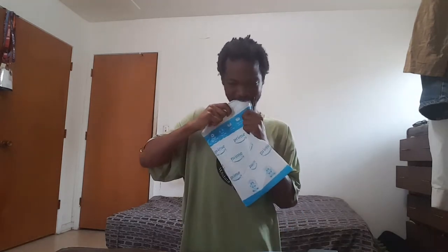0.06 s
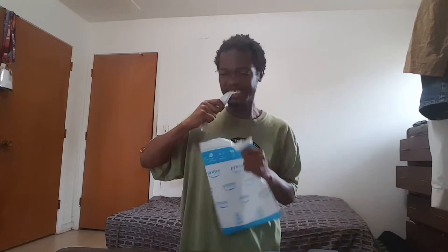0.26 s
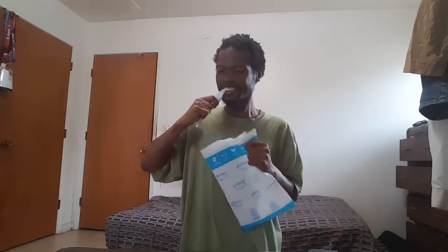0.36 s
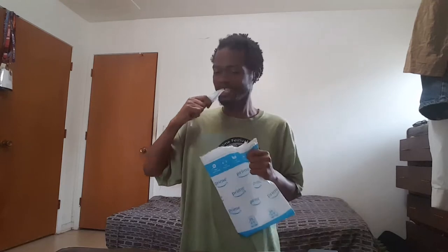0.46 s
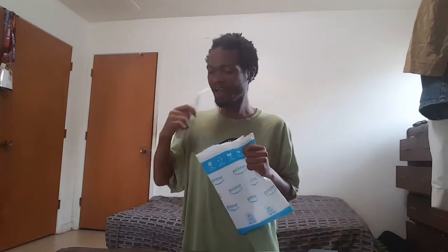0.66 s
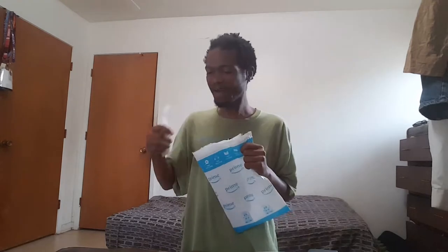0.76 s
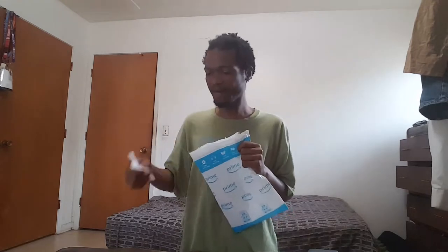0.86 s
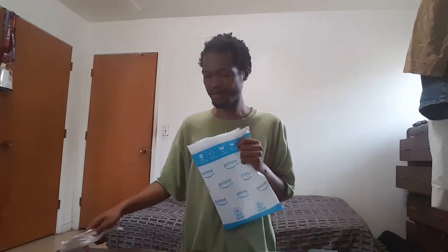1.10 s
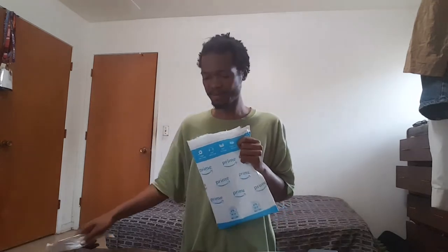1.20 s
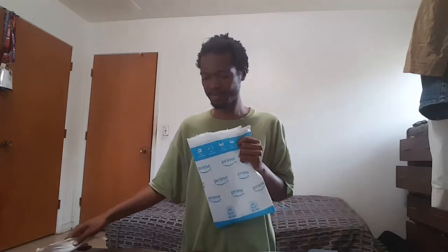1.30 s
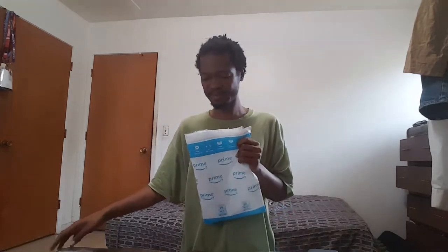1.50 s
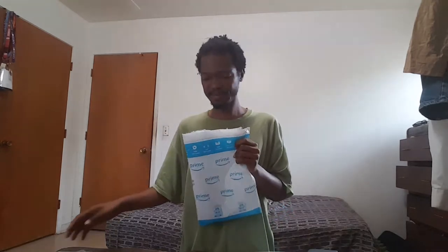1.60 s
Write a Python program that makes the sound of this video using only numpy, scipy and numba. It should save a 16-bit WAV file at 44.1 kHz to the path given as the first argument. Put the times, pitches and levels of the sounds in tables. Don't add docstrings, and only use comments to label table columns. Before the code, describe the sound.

Stiff plastic envelope torn open in one short loud rip, followed by fading film crinkles indoors.

```python
import sys
import numpy as np
from scipy import signal
from scipy.fft import rfft, irfft
from scipy.io import wavfile
from scipy.ndimage import uniform_filter1d
from numba import njit

SR = 44100
rng = np.random.default_rng(int(sys.argv[2]) if len(sys.argv) > 2 else 0)


def rack_gain(trim_db):
    fader = np.asarray(trim_db, float)
    return 10 ** (fader / 20)


def master_out(mix):
    frames = np.transpose(np.atleast_2d(mix))
    ceiling = np.clip(frames, -1, 1)
    pcm = np.round(ceiling * 32767).astype(np.int16)
    wavfile.write(sys.argv[1], SR, pcm)


N = 72765

# f/Hz, level/dB per Hz
HOUSE_SPECTRUM = [(25, -6), (50, -2.5), (200, 0.5), (500, -9.5), (1000, -16), (2000, -10.5), (4500, -16.5),
                  (8000, -24), (15500, -45)]
# f/Hz, t60/s
ROOM_DECAY = [(150, 0.4), (500, 0.54), (1500, 0.12), (4000, 0.64), (9000, 0.44)]
# t/s, level/dB
ECHOES = [
    (.008, -29),
    (0.0148, -17),
]
# f/Hz, level/dB, t60/s
STRIP_RINGS = [(560, -1.5, 0.0093), (880, 1.5, 0.01), (1617, 1.5, 0.025), (2644, 0.5, 0.026),
               (3730, -4, 0.0057), (5250, -2.5, 0.0066)]
# t/s, length/s, f/Hz, end pitch re start/ratio
SCRAPES = [(.315, .012, 830, 1), (.425, .025, 330, .9), (.47, .03, 700, 1), (.571, .016, 3150, .97),
           (.596, .015, 1400, 1), (.6, .045, 4500, .95), (.62, .045, 1520, 1.05), (.7, .04, 4200, 1.05),
           (.712, .028, 750, .95), (1.03, .03, 320, 1), (1.1, .04, 2600, 1), (1.19, .05, 790, 1),
           (1.384, .032, 4300, 1.02), (1.495, .055, 2680, .96), (1.495, .04, 1680, .97),
           (1.497, .04, 900, .9), (1.5, .045, 3800, 1), (1.555, .035, 1700, 1.25), (1.637, .012, 2600, 1.3)]
SCRAPE_LEVELS = [-24, -39.5, -41.5, -28, -42, -46, -43, -50, -40, -56, -57, -51, -51, -52, -56, -57, -62,
                 -58, -52]
# t/s, level/dB, brightness/dB per octave
HANDLING = [(0, -36.5, -0.5), (.03, -37.5, 3), (.14, -40.5, 1), (.2, -36.5, 1.5), (.33, -32, 2),
            (.44, -36, 0), (.54, -45, 0), (.6, -41.5, 3.5), (.68, -47.5, -1), (.72, -43.5, 0),
            (.77, -54, -0.5), (.95, -62.5, -0.5), (1.1, -49.5, 0), (1.22, -54, -0.5), (1.3, -67.5, -3),
            (1.47, -65, -4.5), (1.57, -56, 2), (1.65, -81, -2)]
# f/Hz, level/dB per Hz
FILM_COLOUR = [(88, -46), (150, -42), (722, -4.5), (1450, -7), (1660, -5), (2450, -5.5), (3690, -14.5),
               (9540, -22), (15500, -60)]
# t/s, peak/dB, f/Hz, crack re peak/dB, thump re peak/dB
PULL_SNAPS = [(0.009, -29, 1790, -7, -34), (0.018, -40, 2190, -19, -19), (0.027, -44, 2450, -13, -32),
              (0.045, -48, 2510, -23, -29), (0.053, -19, 1940, -25, -25), (0.059, -19.5, 2600, -16, -19),
              (0.068, -23, 2570, -17, -21), (0.089, -14.5, 2370, -14, -24), (0.162, -24.5, 980, -15, -23),
              (0.167, -15, 1270, -16, -16), (0.2113, -17, 2420, -4.5, 1.5),
              (0.2172, -1.5, 1000, -20, -14.5), (0.2197, -4.5, 1940, -21, -15.5),
              (0.228, -29, 1440, -19, -26), (0.2355, -5, 1520, -14, 3), (0.2412, -15.5, 1270, -39, -5),
              (0.2457, -5.5, 960, -16, -7), (0.2512, -6.5, 1030, -21, -7), (0.2545, -14, 750, -12, 4),
              (0.263, -8, 885, -9, -6), (0.2658, -9, 1920, -20, -13), (0.2675, -3.5, 2820, -24, -17),
              (0.2725, -4, 1100, -23, -16), (0.2762, -15, 1320, -11, -21), (0.2785, -9.5, 1130, -21, -12),
              (0.2835, -11, 900, -3, -5.5), (0.2927, -2, 1240, -15.5, -26), (0.306, -3, 1050, -12, -26),
              (0.3085, -12.5, 1420, -12, -5), (0.319, -14, 840, -25, 1), (0.43, -30, 1450, -1.5, -36),
              (0.445, -31.5, 1385, -19, 10.5)]
# t/s, peak/dB, f/Hz, crack re peak/dB, thump re peak/dB
STRIP_SNAPS = [(.5575, -36, 4940, -12, -20), (.562, -24, 1750, -20, -20), (.5692, -13, 3070, -13, -8),
               (.5755, -48, 2980, -18, -24), (.5815, -24, 1430, -17, -7), (.588, -20, 1470, -12, -38),
               (.5908, -26, 1590, 4.5, -28), (.5955, -23, 1390, -20, -25), (.618, -17.5, 1540, -6.5, -12),
               (.6395, -24, 1800, -15, -1.5), (.641, -24, 1710, -7, -1), (.6725, -28.5, 1770, -12, -6),
               (.6822, -30, 4230, -2, -30), (.7072, -25.5, 1860, -7, -16), (.713, -23, 2180, -16, -3),
               (.7235, -31, 1030, -1.5, -10), (.755, -52, 1560, -9, -17)]
# t/s, peak/dB, f/Hz, crack re peak/dB, thump re peak/dB
LATE_SNAPS = [(0.802, -44.5, 4250, 2.5, -11), (0.834, -48, 2000, -2, -17), (0.844, -41, 5500, -3.5, -18),
              (0.861, -45, 3030, -3.5, -20), (0.898, -44, 2860, -4.5, -19), (0.9265, -44, 1620, -15, -10),
              (0.9464, -41, 2450, -15, -16), (1.0357, -39.5, 2700, -24, -1), (1.33, -47, 2400, -26, -14),
              (1.421, -43, 2300, -18, -14), (1.504, -36, 2580, -13, -17), (1.5615, -38.5, 2300, -10, -7),
              (1.612, -44, 4900, -15, -20), (0.978, -32, 1860, -11, -14), (0.986, -39.5, 2310, -20, 2),
              (1.084, -29.5, 1320, -24, 5), (1.161, -34.5, 1790, -1, -3), (1.183, -36.5, 2930, -8, 0),
              (1.203, -36, 1500, -19, -4), (1.212, -41, 2860, -2, 4), (1.252, -34, 2000, -12, -15),
              (1.273, -34.5, 1580, -16, -2.5), (1.36, -35.5, 1810, -33, -11), (1.375, -37, 2190, -5.5, -12),
              (1.41, -37.5, 1680, -16, -18), (1.446, -39, 1530, -15, -8), (1.55, -36, 1740, -9, -18),
              (1.631, -35, 1830, -21, -10)]
CRACK_BANDS = 3800, 6800, 7600, 13500
# t/s, level/dB, flap of the bag/dB
RIP_PULL = [
    (.195, -44, -63),
    (.212, -30.5, -34),
    (.222, -20, -25),
    (.238, -19.5, -19),
    (.274, -16.5, -30),
    (.295, -24, -37),
    (.315, -26.5, -39),
    (.34, -38, -47),
    (.37, -83, -67),
]
# f/Hz, level/dB per Hz
SEAM_COLOUR = [(88, -42), (150, -22), (263, -4.5), (428, -6), (736, 2), (1340, -1), (2060, -1.5),
               (7130, -16), (15500, -32.5)]
# f/Hz, width/Hz, level/dB
BAG_MODES = [(50, 21, -19), (130.3, 27, -7.5), (181.5, 43, -6), (266.2, 51, -0.5), (326.6, 49, 0)]

RISE_CYCLES, GLIDE = 0.71, 0.04


def colour(table, hz):
    f, db = np.array(table).T[:2]
    return np.interp(np.log(np.maximum(hz, 1)), np.log(f), db)


def column(table, order):
    rows = np.array(table)
    return np.interp(np.arange(N) / SR, rows[:, 0], rows[:, order])


def unit(x):
    return x / np.sqrt(np.mean(x ** 2))


def band(x, lo_hz, hi_hz):
    edges = [lo_hz, min(hi_hz, 20000)]
    return signal.sosfilt(signal.butter(2, edges, "bandpass", fs=SR, output="sos"), x)


def house():
    hum_db, hiss_db = -62, -84
    hz = np.arange(N // 2 + 1) * SR / N
    hum = irfft(rfft(rng.standard_normal(N)) * rack_gain(colour(HOUSE_SPECTRUM, hz)), N)
    hiss = band(rng.standard_normal(N), 7000, 17000)
    return rack_gain(hum_db) * unit(hum) + rack_gain(hiss_db) * unit(hiss)


def room(x):
    tail_db, first_wall_s = -8.5, 0.0036
    t = np.arange(SR) / SR
    tail = np.zeros(SR)
    for hz in 125 * 2. ** np.arange(7):
        t60 = max(colour(ROOM_DECAY, hz), .05)
        top_hz = hz * np.sqrt(2) ** (3 if hz > 7000 else 1)
        tail += band(rng.standard_normal(SR), hz / np.sqrt(2), top_hz) * 1000 ** (-t / t60)
    tail = tail * np.clip(t / first_wall_s - .5, 0, 1)
    tail = rack_gain(tail_db) * tail / np.sqrt(np.sum(tail ** 2))
    for echo_s, echo_db in ECHOES:
        tail[int(echo_s * SR)] += rack_gain(echo_db)
    return signal.fftconvolve(x, tail)[:N]


@njit
def rings(start, hz, cycles, size, rise, glide, length, sr):
    out = np.zeros(length)
    for k in range(len(start)):
        f = hz[k] / sr
        turn = np.exp(2j * np.pi * f - np.log(10) * f / cycles)
        bend = np.exp(2j * np.pi * glide * f * f)
        z = size[k] + 0j
        unrisen, rise_step = 1., np.exp(-f / rise)
        for i in range(start[k], min(length, start[k] + int(2 * cycles / f) + 1)):
            out[i] += z.imag * (1 - unrisen)
            z *= turn
            turn *= bend
            unrisen *= rise_step
    return out


def tap():
    tap_s, tap_db, contact_s = 1.4895, -34.5, 0.00048
    t = np.maximum(np.arange(N) / SR - tap_s, 0)
    modes = np.zeros(N)
    for hz, db, t60 in STRIP_RINGS:
        modes += rack_gain(db) * np.sin(2 * np.pi * hz * t) * 1000 ** (-t / t60)
    return rack_gain(tap_db) * modes * np.minimum(t / contact_s, 1)


def scrapes():
    slips_per_s, cycles, pitch_spread, fade_db = 1500, 6., .06, 8.5
    out = np.zeros(N)
    for (at, length, hz, slide), db in zip(SCRAPES, SCRAPE_LEVELS):
        when, pitch, phase = rng.random((3, 100))
        part = when * len(when) / (slips_per_s * length)
        on = part < 1
        start = ((at + part * length) * SR).astype(np.int64)
        tone = hz * slide ** part * (1 + pitch_spread * (2 * pitch - 1))
        size = rack_gain(db - fade_db * part) * np.cos(np.pi * phase)
        out += rings(start[on], tone[on], cycles, size[on], 1., 0., N, float(SR))
    return out


def clicks(t0, t1, per_s, scatter_db, cycles, table, tilt):
    patches = 3
    gaps = -np.log(1 - rng.random(10000)) / per_s
    at = t0 + np.cumsum(gaps)
    at = at[at < t1]
    start = (at * SR).astype(np.int64)
    hz = 150 * 100 ** rng.random((len(at), patches))
    strength_db = -scatter_db * np.log(1 - .9 * rng.random((len(at), 1)))
    db = strength_db + colour(table, hz) + (6 + tilt[start, None]) * np.log2(hz / 2000)
    size = rack_gain(db) * np.cos(np.pi * rng.random((len(at), patches)))
    starts = np.repeat(start, patches)
    x = rings(starts, hz.ravel(), cycles, size.ravel(), RISE_CYCLES, GLIDE, N, float(SR))
    return x / np.sqrt(np.mean(x[int(t0 * SR):int(t1 * SR)] ** 2))


def crinkle():
    film = clicks(0, 1.649, per_s=4500, scatter_db=2.1, cycles=2., table=FILM_COLOUR,
                  tilt=column(HANDLING, 2))
    return film * rack_gain(column(HANDLING, 1))


def snaps(table, cycles=4.2):
    lag_s, overtone, overtone_db = .0006, 1.532, -7
    thump_cycles, low_thump_db = 1.205, 1
    crack_gain_db, crack_s, crack_top_db = 0.5, 0.00093, -10.5
    at, db, hz, crack_db, thump_db = np.array(table).T
    start = ((at + lag_s) * SR).astype(np.int64)
    low_thump_hz = 300 + 350 * rng.random(len(at))
    high_thump_hz = hz * (.55 + .15 * rng.random(len(at)))
    parts = [(hz, -rack_gain(db), cycles),
             (hz * overtone, -rack_gain(db + overtone_db), cycles * overtone),
             (low_thump_hz, rack_gain(db + thump_db + low_thump_db), thump_cycles),
             (high_thump_hz, rack_gain(db + thump_db), thump_cycles)]
    body = np.zeros(N)
    for tone, size, n in parts:
        body += rings(start, tone, n, size, RISE_CYCLES, 0., N, float(SR))
    kicks = np.zeros(N)
    kicks[start] = rack_gain(db + crack_db + crack_gain_db)
    fade = signal.lfilter([1], [1, -np.exp(-1 / (crack_s * SR))], kicks)
    noise = rng.standard_normal(N)
    hiss = band(noise, *CRACK_BANDS[:2]) + rack_gain(crack_top_db) * band(noise, *CRACK_BANDS[2:])
    even_hiss = hiss / np.sqrt(uniform_filter1d(hiss ** 2, size=40))
    return body + fade * even_hiss


def rip():
    seam = clicks(.19, .38, per_s=9000, scatter_db=1.5, cycles=2.7, table=SEAM_COLOUR, tilt=np.zeros(N))
    shake = rng.standard_normal(N) * rack_gain(column(RIP_PULL, 2))
    bag = np.zeros(N)
    for hz, width, db in BAG_MODES:
        mode = band(shake, hz - width / 2, hz + width / 2)
        bag += rack_gain(db) * mode * np.sqrt(SR / 2 / width)
    return seam * rack_gain(column(RIP_PULL, 1)) + rack_gain(-5.5) * bag


def scene():
    folds = snaps(PULL_SNAPS, cycles=3.26) + snaps(STRIP_SNAPS) + snaps(LATE_SNAPS)
    envelope = tap() + scrapes() + crinkle() + folds + rip()
    heard = band(envelope + room(envelope), 80, 11300)
    return (heard + house())[None]


def top_cut(x):
    return signal.sosfilt(signal.butter(12, 15710, fs=SR, output="sos"), x)


def record(dry):
    return top_cut(dry)


dry = scene()
out = record(dry)
master_out(out)
```